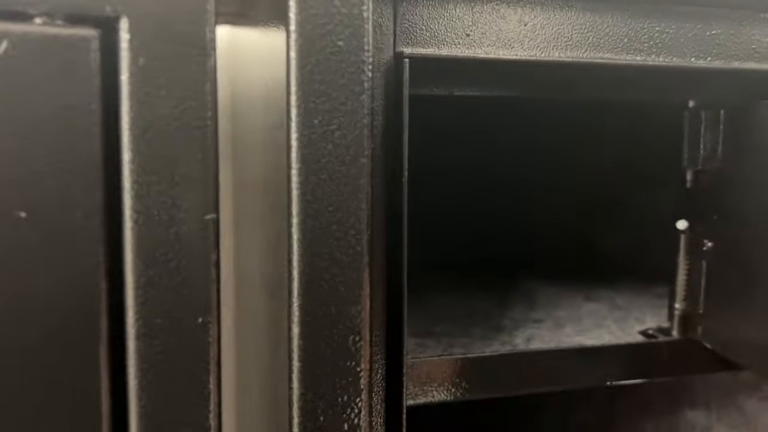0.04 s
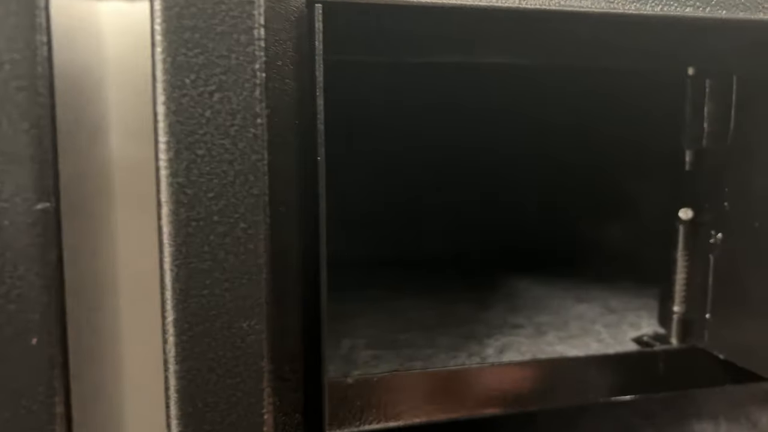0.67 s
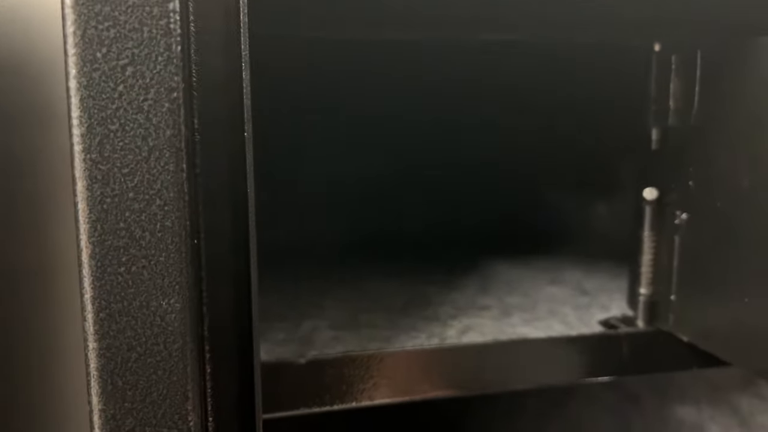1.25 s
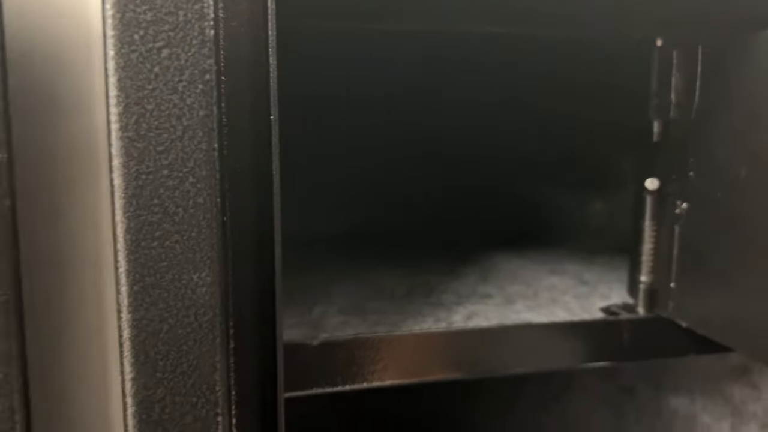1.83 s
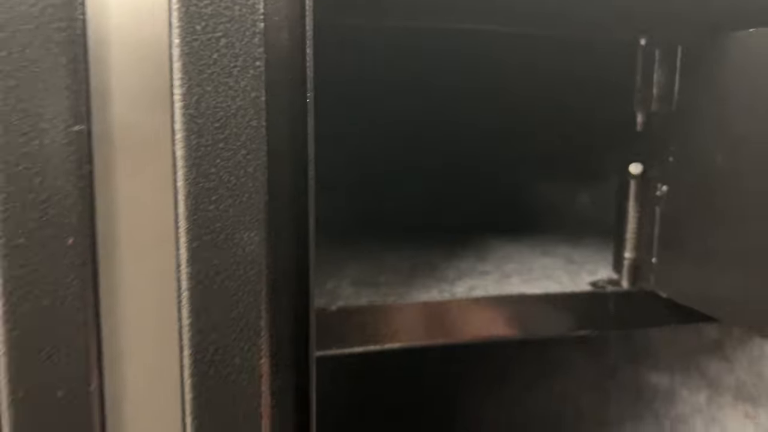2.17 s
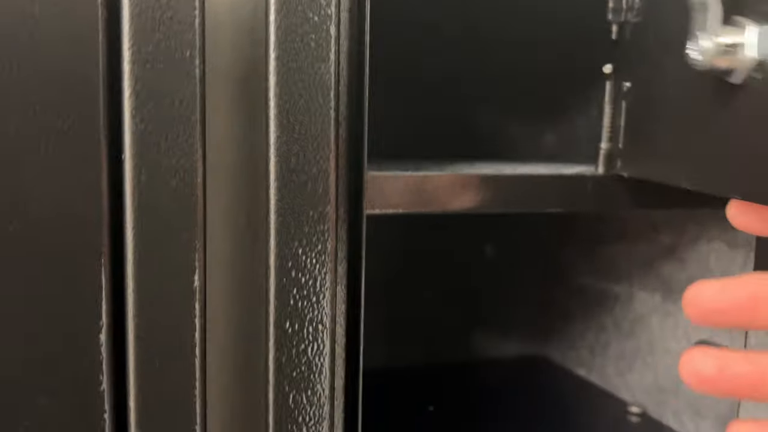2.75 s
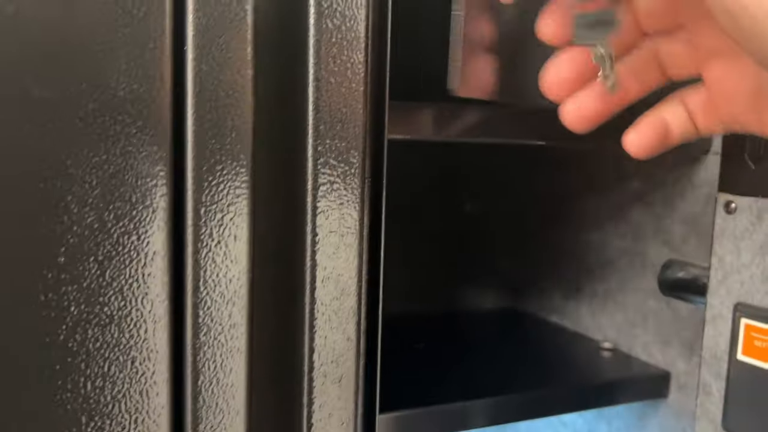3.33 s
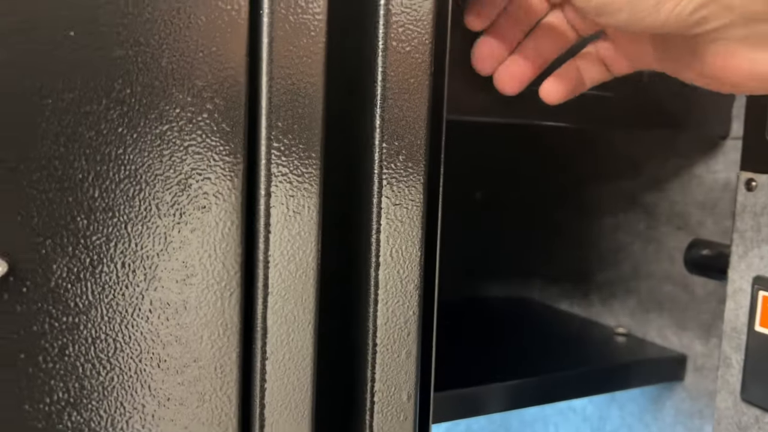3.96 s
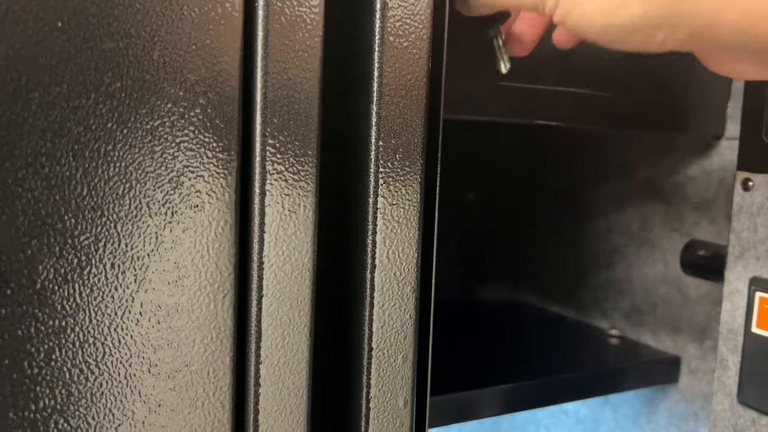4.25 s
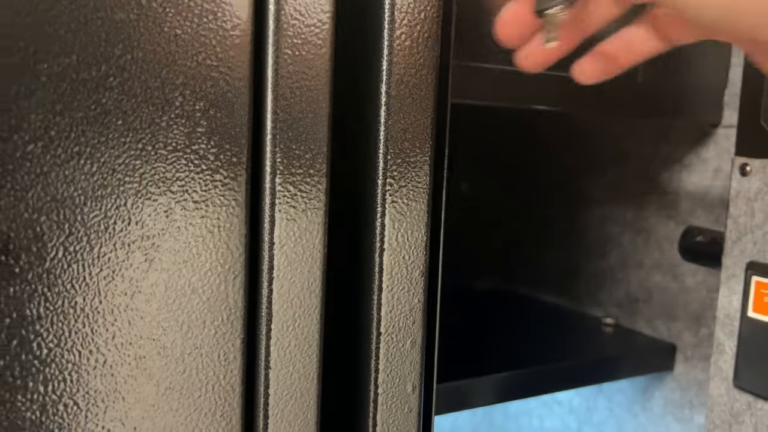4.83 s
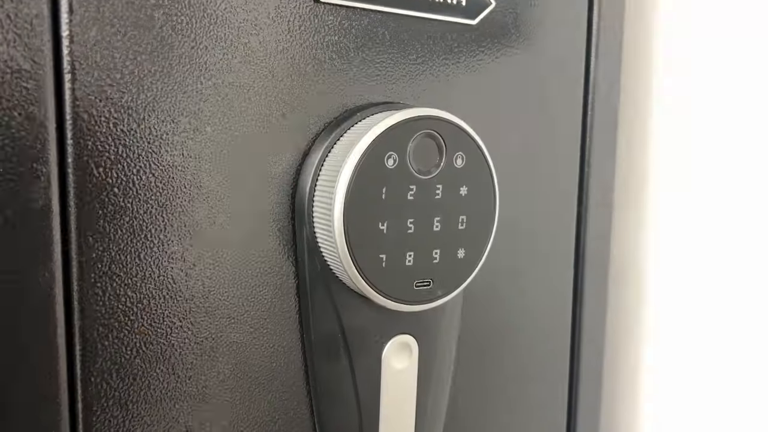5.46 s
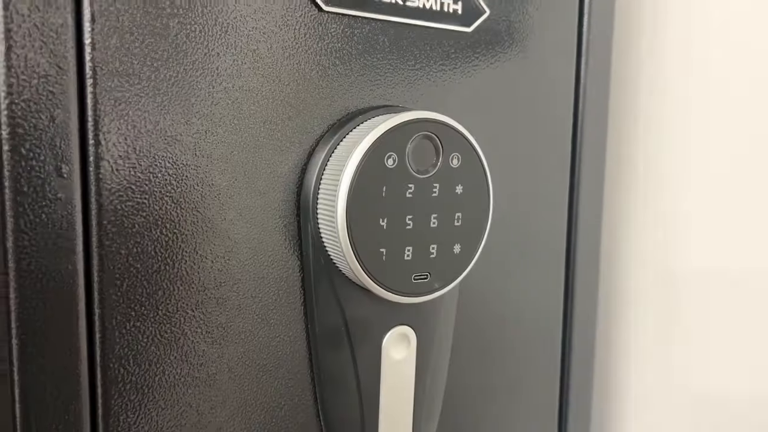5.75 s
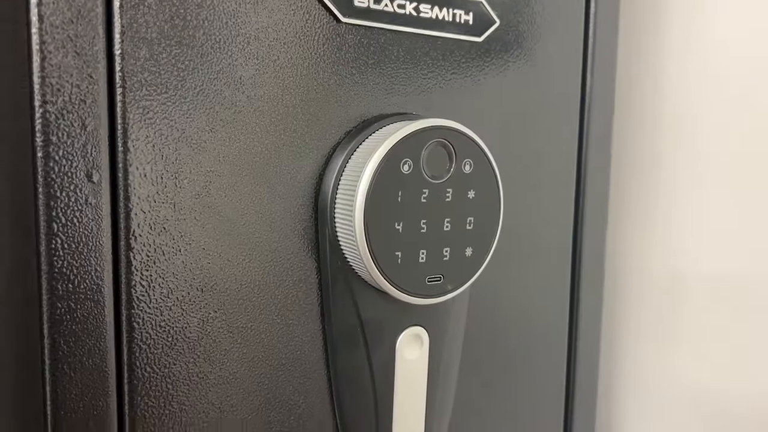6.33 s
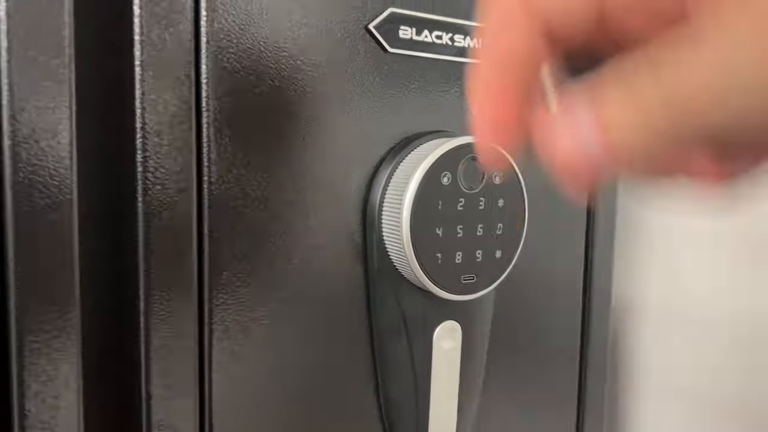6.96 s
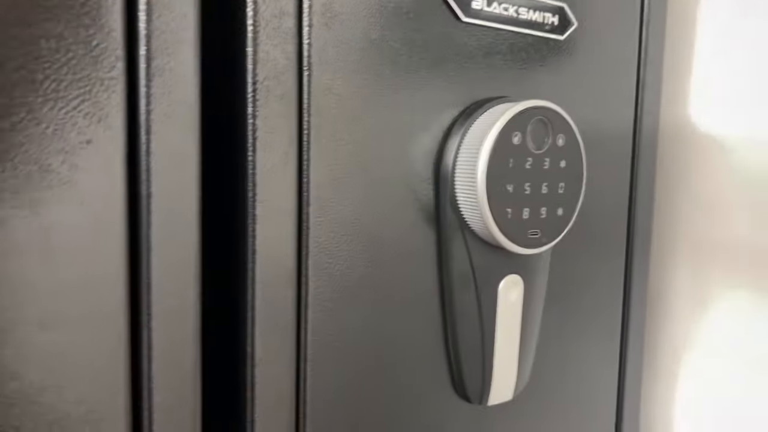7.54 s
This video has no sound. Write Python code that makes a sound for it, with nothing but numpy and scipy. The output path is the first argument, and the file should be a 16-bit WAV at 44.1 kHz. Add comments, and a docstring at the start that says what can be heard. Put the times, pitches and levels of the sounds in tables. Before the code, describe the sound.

In a small room with humming ventilation, a quick run of ringing metal clacks comes from a safe's bolts, heard up close. Clothes rustle softly before a small steel door bumps and shuts with a loud crack and thud. Gritty key scrapes, taps and sharper knocks follow at the lock. Then come faint key clinks, a cloth scuff and thin squeaks, ending with a short metallic knock.

```python
"""Locking a steel safe

In a small, humming room, heavy bolts clack against their stops and ring. A hand swings the small
inner door shut: it cracks and thuds, and its steel rings on. The key scrapes over the pins of the
lock and comes out. Keys clink, clothes rustle, a sleeve scuffs, and the door is knocked once more.
All of it is heard from close by, with a short echo from the walls."""
import sys
import numpy as np
from scipy import signal
from scipy.fft import rfft, irfft, next_fast_len
from scipy.io import wavfile
from scipy.ndimage import uniform_filter1d

SR = 44100
rng = np.random.default_rng(int(sys.argv[2]) if len(sys.argv) > 2 else 0)


def generate_wav(sig):
    """Save sig (samples, or channels by samples) to the path in sys.argv[1] as 16-bit PCM at SR."""
    pcm = np.round(np.clip(np.atleast_2d(sig).T, -1, 1) * 32767).astype(np.int16)
    wavfile.write(sys.argv[1], SR, pcm)


N = 339570
TIME = np.arange(N) / SR  # seconds since the scene began
AGE = np.arange(24000) / SR  # seconds since one short sound began


# Each clack of a bolt: start_s, level_db, click_db, damping_s
CLACKS = [(.072, -29, -61.5, 0.23), (.107, -21, -30, 0.19), (0.159, -28, -36, 0.11), (.205, -45, -62, .33),
          (.229, -43.5, -60, 0.3), (.272, -54.5, -75, 0.34), (3.282, -31.5, -43.5, 0.013),
          (4.539, -49, -56, 0.014), (4.6718, -47, -52, 0.01)]
# The tones a bolt rings with: pitch_hz, level_db, ring_s (time to fade by 60 dB if left alone)
BOLT_TONES = [(287.5, -12, .8), (499.8, -8.5, .9), (868, -17, .8), (1055, -6, .27), (1299.8, 3, .27),
              (1322, -1, .18), (1379, -5, .2), (1396.8, 1, .25), (1520, -8, .25), (1615, -5, .28),
              (1695, -7, .26), (1817.3, -3, .33), (1969, -9, .25), (2127.5, -3, .19), (2162.7, 3, .24),
              (2966, -13, .22), (3104, -7, .2), (3408.4, -3, .19), (4100, 1, .07), (4210.5, 2, .1),
              (4597, -6, .09), (4939, 2, .08), (5556, -17, .2), (6228, -10, .13)]
# The noisy clatter above those tones: pitch_hz, level_db
BOLT_CLATTER = [(120, -17), (300, -18.5), (500, -22), (800, -15), (1300, -2), (2100, -1), (2600, -11),
                (3400, -2.5), (3800, -9.5), (4170, 0), (4400, -11.5), (4900, 1.5), (5200, -12.5),
                (9000, -27.5), (16000, -30.5)]
def bolts():
    """Heavy steel bolts hit their stops and ring, until the stop soaks up the ringing."""
    out = np.zeros((2, N))
    for start, db, click_db, damping_s in CLACKS:
        # a weaker, shorter twin close to each tone makes it wobble
        twins = [(hz * (1 + .02 * rng.standard_normal()), level - 8, .55 * ring_s)
                 for hz, level, ring_s in BOLT_TONES]
        tones = amp(-1.4) * ring(BOLT_TONES + twins, uneven_db=1, spread=.7)
        steel = tones + amp(-5.5) * clatter(BOLT_CLATTER, direct=.1)
        pressed = (.68 + .52 * np.exp(-(AGE / .019) ** 2)) * np.exp(-AGE / damping_s)
        clack = amp(db) * steel * pressed + amp(click_db) * click(ring_s=.038)
        add(out, start, clack * onset(.0014))
    return out


# The door meets its frame: start_s, panel_db, crack_db, thud_db, thud_hz, spot_hz, spot_db
KNOCKS = [(2.477, -47, -50.5, -33, 116.4, 1320, -14), (3.281, -35, -42, -48.5, 201, 1436, 7.5),
          (3.7719, -23.5, -22, -18.5, 162, 775, 4), (4.543, -43.5, -46.5, -33.5, 168.5, 555, 12),
          (4.58, -39.5, -72, -46.5, 182, 425, 15), (4.669, -37, -42, -39.5, 165.5, 1220, 6.5),
          (7.676, -41.5, -43.5, -39.5, 197, 1290, 6)]
# Soft bumps of the hand and the swinging door: start_s, level_db, pitch_hz
BUMPS = [(0.238, -41, 69.8), (0.927, -58.5, 499), (2.686, -45, 210), (2.749, -42.5, 320),
         (3.323, -30.5, 199.4), (3.353, -33.5, 307), (3.556, -40.5, 236.5), (3.629, -40.5, 183.5),
         (3.729, -42, 190.4), (3.759, -36, 173), (3.784, -26.5, 82.2), (3.797, -31.5, 236.7),
         (3.999, -36, 75.6), (4.065, -33.5, 79.5), (4.105, -38, 385), (4.206, -36, 89.5), (4.287, -39, 75),
         (4.487, -39, 128), (4.676, -33.5, 97)]
# Dull taps, mostly from the latch behind the panel: start_s, level_db, spot_hz, spot_db
TAPS = [(2.639, -50, 778, 21), (3.752, -36, 644, -1), (4.023, -48, 1424, 4), (4.051, -43.5, 586, 5),
        (4.091, -43, 894, 2), (4.162, -39, 1910, 1), (4.113, -41.5, 1700, 1), (4.196, -37.5, 1250, 1),
        (4.223, -47, 850, 29.5), (4.386, -50.5, 1187, 7.5), (4.484, -52.5, 1490, 1),
        (7.574, -64.5, 990, 10)]
DULL_HZ = 2420  # soft touches stir little above this pitch
def door():
    """Hard knocks crack, ring and thud; soft bumps mostly thud; taps mostly ring the panel."""
    out = np.zeros((2, N))
    for start, panel_db, crack_db, thud_db, thud_hz, spot_hz, spot_db in KNOCKS:
        contact_s = .0032 * 2 ** ((-43 - crack_db) / 15.5)  # harder knocks are more sudden
        tones_db = 5 + .42 * (panel_db + 24.5)  # and ring more purely
        knock = panel(panel_db, spot_hz, spot_db, tones_db) + amp(crack_db) * crack()
        add(out, start, knock * onset(contact_s))
        add(out, start + .005, amp(thud_db) * thud(thud_hz) * onset(.0013))  # the door gives way
    for start, db, hz in BUMPS:
        steel = dull(panel(db - 7, hz, spot_db=0, tones_db=-10.5), above_hz=880)
        add(out, start, (amp(db) * thud(hz) + steel) * onset(.0078))
    for start, db, spot_hz, spot_db in TAPS:
        steel = dull(panel(db, spot_hz, spot_db, tones_db=-.5), DULL_HZ)
        add(out, start, (steel + amp(db - 11.5) * box()) * onset(.002))
    return out


# The tones of the door panel: pitch_hz, level_db, ring_s
PANEL_TONES = [(496.4, .5, .28), (592, -15, .5), (665, -9, .3), (695, -5, .3), (778, -5, .27),
               (863.4, 2, .29), (1007, -10, .29), (1072, -1, .28), (1335, -3.5, .21), (1480, -10, .2),
               (1663, -11, .2), (1783, -1, .13), (1852, -1, .14), (2150, -11, .11), (2770, -13, .07)]
# The panel's noisy clatter: pitch_hz, level_db
PANEL_CLATTER = [(120, -23), (350, 6.5), (600, -2), (900, -3.5), (1400, -3), (2100, -8.5), (2700, -12),
                 (5000, -10.5), (16000, -44.5)]
def panel(level_db, spot_hz, spot_db, tones_db):
    """The panel rings, brighter for light taps; the spot that is hit shifts the level near spot_hz."""
    tilt = np.clip(.19 * (-21.5 - level_db), 0, 4)  # dB per octave
    spot = lambda hz: spot_db * np.exp(-(np.log2(hz / spot_hz) / .28) ** 2)
    tones = [(hz, db + spot(hz) + tilt * np.log2(hz / PANEL_TONES[0][0]), ring_s)
             for hz, db, ring_s in PANEL_TONES]
    ringing = amp(tones_db) * ring(tones, uneven_db=1.8, spread=.45)
    pitches = np.geomspace(100, 16000, 60)
    bass_cut_db = tilt * np.log2(np.minimum(pitches, DULL_HZ) / DULL_HZ)
    colour = np.transpose([pitches, look_up(PANEL_CLATTER, pitches) + spot(pitches) + bass_cut_db])
    return amp(level_db) * unit_hit(ringing + clatter(colour, direct=.45))


def thud(hz):
    """The door bends to and fro a few times under the hand and shakes the box."""
    bending = unit_hit(np.sin(2 * np.pi * hz * AGE) * onset(.0067) * np.exp(-(AGE / .021) ** 2))
    return amp(-.5) * bending + amp(-7) * box()


# The low tones of the safe's body: pitch_hz, level_db, ring_s
BOX_TONES = [(62, -8, .5), (86, -6, .45), (104, -6, .3), (161.4, -2, .25), (212.4, 3.5, .36), (252, -6, .3),
             (289.3, 2, .32), (394, -9, .3), (449, -7, .35)]
def box():
    """The whole steel box booms."""
    return ring(BOX_TONES, uneven_db=4.5, spread=.13) * onset(.0041)


# How long the clatter lasts: pitch_hz, ring_s
CLATTER_FADE = [(200, 0.93), (1000, 0.38), (2500, 0.17), (6000, 0.13), (15000, 0.051)]
def clatter(colour, direct):
    """Struck steel has so many short, crowded tones that they blur into noise."""
    burst = fade_by_pitch(coloured(noise(10240, direct), colour), CLATTER_FADE)
    return unit_hit(padded(burst))


# The tone colour of steel edges meeting: pitch_hz, level_db
EDGE_COLOUR = [(600, -14), (2000, 3), (3600, -10), (5000, -1), (6200, -3), (7100, -2), (8800, -4.5),
               (12400, -5.5), (13500, -6), (16000, -22.5)]
# Pitches that stand out in it: pitch_hz, width_hz, level_db
EDGE_PEAKS = [(3270, 32, -6), (5400, 21, -5), (6720, 120, 1.5), (7880, 50, 0), (8300, 79, -8),
              (8600, 32, -4.5), (11300, 55, -1), (12400, 84, -1)]
def click(ring_s, extra_peaks=()):
    """Two steel edges meet with a bright click; small parts add a pitch of their own."""
    hiss = coloured(noise(4096, direct=.93), EDGE_COLOUR)
    burst = resonant(hiss, EDGE_PEAKS + list(extra_peaks), floor_db=-5)
    return unit_hit(padded(burst) * amp(-60 * AGE / ring_s))


def crack():
    """The door's edges click, then ring on faintly."""
    hiss = coloured(noise(len(AGE), direct=.8), EDGE_COLOUR)
    ringing = resonant(hiss, EDGE_PEAKS, floor_db=-12.5) * amp(-60 * AGE / .12)
    return click(ring_s=.04) + amp(-26) * unit_hit(ringing)


# The ringing after the slam: start_s, level_db, ring_s
AFTER_RING = (3.782, -45, .36)
# The high pitches of the door's steel: pitch_hz, width_hz, level_db
STEEL_PEAKS = [(2770, 40, 0), (3280, 50, 3), (4600, 41, 1), (5290, 70, -4), (5540, 30, 1), (6910, 80, 0),
               (7320, 42, -3), (7880, 70, -2)]
def after_ring():
    """The door's steel rings on after the slam, bright and slightly grainy."""
    start, db, ring_s = AFTER_RING
    grain = 2 + grains(len(AGE), per_s=560, fade_s=.002)
    hiss = grain * coloured(noise(len(AGE), direct=.6), EDGE_COLOUR)
    out = np.zeros((2, N))
    add(out, start, amp(db) * resonant(hiss, STEEL_PEAKS, floor_db=-15.5) * amp(-60 * AGE / ring_s))
    return out


# Each scrape of steel on steel: start_s, level_db, length_s, rasp_hz
SCRAPES = [(0.054, -58, 0.0097, 3480), (3.267, -62.5, .01, 7000), (3.294, -43, .005, 4500),
           (3.312, -44, .003, 8000), (3.321, -44, .002, 8000), (3.36, -67, 0.045, 4600),
           (3.39, -56, .004, 8400), (3.758, -53.5, 0.0064, 7000), (4.026, -73, 0.012, 13500),
           (4.047, -52, 0.0048, 6740), (4.062, -53, 0.0065, 13600), (4.075, -50, 0.0031, 8070),
           (4.091, -56, 0.0021, 8030), (4.109, -55, .004, 6650), (4.118, -55, .006, 8070),
           (4.171, -53, .002, 3500), (4.183, -47, 0.0088, 13700), (4.195, -50.5, 0.0062, 3460),
           (4.439, -69, 0.018, 13900), (4.523, -61, 0.0083, 5100), (4.534, -45, .009, 7000),
           (4.559, -41.5, 0.011, 4500), (4.579, -39, .007, 4360), (4.597, -42.5, 0.006, 5040),
           (4.615, -46, .007, 6900), (4.65, -50, .008, 8000), (4.658, -40, 0.002, 4600),
           (4.669, -44, 0.0019, 12400), (4.68, -55, 0.0016, 13000), (6.616, -64, .003, 12000),
           (6.708, -68.5, .003, 11300), (7.264, -68, .003, 6000), (7.315, -72.5, .003, 6200),
           (7.665, -38.5, .003, 4550), (7.671, -37, 0.014, 4770)]
# The tone colour of a scrape: pitch_hz, level_db
SCRAPE_COLOUR = [(500, -8.5), (2000, -1.5), (3200, -6.5), (4700, 0), (5500, -1), (6600, -0.5), (8500, -5),
                 (10500, -4), (13500, 3.5), (16000, -8.5)]
# Pitches that stand out in it: pitch_hz, width_hz, level_db
SCRAPE_PEAKS = [(1340, 86, -3.5), (1894, 58, -3), (3500, 70, -7), (4420, 22, -3.5), (4560, 46, -0.5),
                (6500, 60, -6), (8000, 83, -0.5), (13000, 52, -7.5), (14730, 88, -3)]
def scrapes():
    """Steel sticks and slips on steel in short, gritty scrapes, some from the key in the lock."""
    out = np.zeros((2, N))
    t = AGE[:SR // 8]
    fade_out = np.clip((.1 - t) / .03, 0, 1)
    for start, db, length, rasp_hz in SCRAPES:
        grip = unit_level(grains(len(t), per_s=900, fade_s=.001) + 1.2)
        pressure = np.minimum(t / .0041, 1) * np.exp(-np.maximum(t - length, 0) / .0065)
        friction = pressure * grip * coloured(noise(len(t), direct=1), SCRAPE_COLOUR)
        scrape = resonant(friction, SCRAPE_PEAKS + [(rasp_hz, 300, -1)], floor_db=-9.5)
        add(out, start, amp(db) * np.sqrt(np.mean(pressure ** 2)) * scrape * fade_out)
    return out


# Each clink of the keys: start_s, level_db, centre_hz (where it rings most)
CLINKS = [(2.716, -64.5, 13000), (2.858, -66.5, 13500), (2.888, -64, 12500), (3.123, -66, 8400),
          (3.141, -67, 10700), (3.276, -46.5, 13600), (3.329, -50.5, 12850), (3.34, -56, 14000),
          (3.403, -54, 8400), (3.409, -46.5, 14200), (3.468, -59.5, 14000), (3.492, -69, 13500),
          (3.518, -69.5, 8400), (5.846, -77, 12720), (6.366, -64.5, 4500), (6.375, -66.5, 7200),
          (6.425, -62, 5300), (6.444, -70, 4080), (6.683, -58.5, 11000), (6.746, -67.5, 6430),
          (6.924, -62, 12500), (7.157, -57.5, 7900), (7.163, -61, 12800), (7.2238, -58.5, 8750)]
# The tones of the keys: pitch_hz, level_db, ring_s
KEY_TONES = [(2680, -5, .06), (4400, -3, .03), (4700, -4, .035), (6400, -3, .03), (7500, -2, .03),
             (8370, 0, .03), (11500, -3, .03), (13000, -1, .025), (14100, -1, .025)]
def keys():
    """Keys touch, ring very briefly and touch again; the grip shifts their pitch each time."""
    out = np.zeros((2, N))
    for start, db, centre_hz in CLINKS:
        for delay, touch_db in [(0, -1), (rng.uniform(.003, .0043), -5)]:
            tones = [(hz * (1 + .03 * rng.standard_normal()),
                      level - 15 * abs(np.log2(hz / centre_hz)), ring_s)
                     for hz, level, ring_s in KEY_TONES]
            ringing = amp(-2) * ring(tones, uneven_db=2, spread=.2)
            clink = ringing + click(ring_s=.03, extra_peaks=[(centre_hz, 700, 10)])
            add(out, start + delay, amp(db + touch_db) * clink * onset(.0007))
    return out


# One scuff of a sleeve: start_s, length_s, landing_db, rubbing_db
SCUFF = (6.44, .13, -50, -58)
# Its tone colour: pitch_hz, level_db
SCUFF_COLOUR = [(500, -13), (1100, -5.5), (1500, -4), (2000, -7.5), (2600, -5.5), (3300, -11), (5500, -14),
                (9000, -41), (16000, -39)]
# Pitches that stand out as it lands, and as it rubs: pitch_hz, width_hz, level_db
LANDING_PEAKS = [(1346, 32, 6), (1600, 92, -6), (2025, 41, 1), (2430, 55, -19), (3890, 200, -2)]
RUB_PEAKS = [(1250, 200, -5), (1530, 200, 0), (2000, 120, -6), (2430, 120, -10)]
def sleeve():
    """Cloth lands with a broad scuff, then rubs on unevenly at a rising pitch."""
    start, length, landing_db, rubbing_db = SCUFF
    grain = amp(1.3 * unit_level(uniform_filter1d(rng.standard_normal(N), size=300)))
    def rub(peaks, floor_db):
        hiss = coloured(noise(next_fast_len(N), direct=.17), SCUFF_COLOUR)
        return unit_level(grain * resonant(hiss, peaks, floor_db)[:, :N])
    touch = amp(landing_db) * swell(start, .0047, rise_s=.0029, fade_s=.045)
    landing = touch * rub(LANDING_PEAKS, floor_db=-12)
    speed = 1 + .5 * np.clip(TIME - start - length / 2, -length / 2, length / 2)
    steady = rub(RUB_PEAKS, floor_db=-15.5)
    rising = np.array([np.interp(np.cumsum(speed) / SR, TIME, side) for side in steady])
    catching = amp(rubbing_db + 2.5 * wander(step_s=.009))
    return landing + catching * swell(start, length, rise_s=.03, fade_s=.08) * rising


# Thin squeaks: start_s, length_s, level_db, pitch_hz
SQUEAKS = [(6.465, .02, -65, 3900), (6.575, .06, -66, 2650), (6.61, .02, -71, 6200),
           (6.645, .022, -68, 6300), (6.66, .07, -66, 1550), (6.68, .04, -70, 6380),
           (6.765, .03, -75, 3100), (7.265, .07, -71, 2700), (7.295, .03, -75, 6300)]
def squeaks():
    """Something smooth sticks and slips, making brief, fuzzy tones."""
    out = np.zeros((2, N))
    for start, length, db, hz in SQUEAKS:
        tone = noise(len(AGE), direct=.8)
        for _ in range(2):  # filtering twice narrows the noise to nearly one pitch
            tone = resonant(tone, [(hz, 220, 0)], floor_db=-60)
        add(out, start, amp(db) * tone * np.sin(np.pi * np.minimum(AGE / length, 1)))
    return out


# Each move of the arm: start_s, length_s, level_db
RUSTLES = [(0, 0.59, -63.5), (0.917, 0.1, -67.5), (1.76, 0.6, -61.5), (2.287, 0.0092, -64.5),
           (2.346, 0.69, -62), (5, 0.42, -72), (5.799, .28, -69), (6.238, 0.32, -63), (6.902, 0.12, -62.5),
           (7.21, 0.13, -67)]
# The tone colour of sliding cloth: pitch_hz, level_db
CLOTH_COLOUR = [(500, 5), (1500, 5.5), (3000, -1.5), (5000, -2), (8000, -6.5), (10500, -11), (13000, -3),
                (16000, -18.5)]
def clothes():
    """Cloth slides with a faint hiss that swells gently with its folds."""
    moves = sum(amp(db) * swell(start, length, rise_s=.52 * length, fade_s=.059)
                for start, length, db in RUSTLES)
    folds = amp(1.3 * wander(step_s=.06))
    return moves * folds * long_noise(CLOTH_COLOUR, direct=.96)


# One brief hiss: start_s, length_s, level_db
SIZZLE = (5.545, .065, -72)
# Its tone colour: pitch_hz, level_db
SIZZLE_COLOUR = [(6500, -42), (8200, 9.5), (9500, 8), (11000, -21), (12500, -35)]
def sizzle():
    """A thin, high hiss sounds for a moment."""
    start, length, db = SIZZLE
    level = amp(db) * swell(start, length, rise_s=.0059, fade_s=.004)
    return level * long_noise(SIZZLE_COLOUR, direct=.45)


# The tone colour of the echo: pitch_hz, level_db
ECHO_COLOUR = [(250, 1), (500, 0.5), (1000, 0.5), (2000, 0), (6000, -9.5), (14000, -15)]
# How long it lasts: pitch_hz, ring_s
ECHO_FADE = [(80, .9), (300, .75), (900, .28), (2000, .4), (6000, .34), (15000, .27)]
def room_echo(x):
    """The walls send back a short, blurred echo with little treble."""
    tail = fade_by_pitch(coloured(noise(len(AGE)), ECHO_COLOUR), ECHO_FADE) * onset(.0095)
    return signal.oaconvolve(x, tail / np.linalg.norm(tail[0]), axes=1)[:, :N]


# Rumbling air and humming tones, at the open safe and in front of its door: pitch_hz, level_db
AIR_OPEN = [(15, -62.5), (25, -37), (42, -7.5), (64, 2), (125, -12.5), (142, -18), (181, -18.5),
            (207, -22.5), (438, -16.5), (621, -31), (927, -31), (1000, -38), (2070, -36.5), (2560, -45.5),
            (15000, -68.5)]
HUM_OPEN = [(59.3, -54), (177.6, -64), (312, -73), (431, -72), (953, -75)]
AIR_FRONT = [(20, -35.5), (32, -9.5), (46, 9.5), (70, -2.5), (125, -12), (170, -16), (293, -12.5),
             (462, -25.5), (952, -27), (1180, -31.5), (1810, -31), (2850, -40.5), (8000, -53.5),
             (15000, -57)]
HUM_FRONT = [(118.4, -49), (231.5, -85), (290.7, -61.5), (296, -66.5), (360.7, -65.5), (958, -75.5),
             (3830, -88)]
def ventilation(turn_s=5.46):
    """The ventilation rumbles and hums, heard at the open safe and then in front of its door."""
    at_open = amp(-49) * long_noise(AIR_OPEN) + hum(HUM_OPEN)
    in_front = amp(-49) * long_noise(AIR_FRONT) + hum(HUM_FRONT)
    turned = np.clip((TIME - turn_s) / .095, 0, 1)
    return np.sqrt(1 - turned) * at_open + np.sqrt(turned) * in_front


def hum(tones):
    """Steady machine tones waver a little in level and pitch."""
    out = np.zeros(N)
    for hz, db in tones:
        level = amp(db + 3.2 * wander(step_s=.25))
        drift = .0012 * min(hz, 400) * wander(step_s=.25)
        out += level * np.sin(2 * np.pi * hz * TIME + drift)
    return out


# How much louder the left microphone is: pitch_hz, difference_db
LEFT_LOUDER = [(100, -2.5), (300, -1.5), (520, -1), (800, -2.5), (1250, -0.3), (1900, 0.5), (3000, 1),
               (4600, 2.5), (7000, 0.4), (13000, -0.8)]
# How far the right one trails behind: pitch_hz, lag_radians
RIGHT_LAG = [(20, -1), (1400, 1.13), (3500, 1.5), (5000, 1.78), (6600, 1.37), (8800, 0.5), (10100, -4),
             (11300, -5), (12200, -5), (15000, -6)]
def microphones(x):
    """Near sound loses its deepest bass and reaches the two microphones a little differently."""
    size = next_fast_len(N)
    hz = np.fft.rfftfreq(size, 1 / SR)
    x = signal.sosfilt(signal.butter(3, 48, "highpass", fs=SR, output="sos"), x)
    left = amp(look_up(LEFT_LOUDER, hz) / 2)
    right = np.exp(-1j * look_up(RIGHT_LAG, hz)) / left
    return irfft(rfft(x, size) * np.array([left, right]), size)[:, :N]


# How alike left and right are for sound from all around: pitch_hz, likeness (0 to 1)
LIKENESS = [(60, 0.99), (130, 0.95), (290, 0.48), (640, 0.056), (1400, 0.064), (15000, 0.059)]
def noise(size, direct=0):
    """Left and right white noise, more alike in the bass and the more direct the sound is."""
    left, other = rfft(rng.standard_normal((2, size)))
    alike = np.clip(direct + (1 - direct) * look_up(LIKENESS, np.fft.rfftfreq(size, 1 / SR)), -1, 1)
    right = alike * left + np.sqrt(1 - alike ** 2) * other
    return irfft(np.array([left, right]), size)


def long_noise(colour, direct=0):
    """Coloured noise that lasts the whole scene."""
    return coloured(noise(next_fast_len(N), direct), colour)[:, :N]


def ring(tones, uneven_db, spread):
    """Fading tones; each hit mixes them anew, and spread puts left and right out of step."""
    hz, db, ring_s = np.transpose(tones)
    weight, skew = rng.standard_normal((2, len(hz)))
    height = amp(db + uneven_db * weight) * (-1) ** np.arange(len(hz))
    sides = height * np.exp(1j * spread * np.outer([-1, 1], skew))
    out = np.zeros((2, len(AGE)))
    for pair, pitch, life in zip(sides.T, hz, ring_s):
        t = AGE[AGE < life]
        tone = np.exp((2j * np.pi * pitch - np.log(1000) / life) * t)
        out[:, :len(t)] += np.outer(pair, tone).imag
    return unit_hit(out)


def grains(size, per_s, fade_s):
    """A grainy level: tiny jumps at chance moments, each dying quickly."""
    hits = (rng.random(size) < per_s / SR) * np.minimum(rng.exponential(1, size), 3)
    return unit_level(signal.lfilter([1], [1, -np.exp(-1 / (fade_s * SR))], hits))


def coloured(x, colour):
    """Gives a sound its tone colour: how strong each pitch is."""
    size = x.shape[-1]
    gain = amp(look_up(colour, np.fft.rfftfreq(size, 1 / SR)))
    return unit_level(irfft(rfft(x) * gain, size))


def resonant(x, peaks, floor_db):
    """Makes a few pitches stand out; the rest sinks to floor_db."""
    f = np.fft.rfftfreq(x.shape[-1], 1 / SR)
    power = sum(amp(db) ** 2 / (1 + (2 * (f - hz) / width) ** 2) for hz, width, db in peaks)
    return unit_level(irfft(rfft(x) * np.sqrt(power + amp(floor_db) ** 2), x.shape[-1]))


def fade_by_pitch(x, ring_times):
    """Lets each pitch die away at its own speed."""
    hz, t, bands = signal.stft(x, SR, nperseg=256)
    fade = amp(-60 * t / look_up(ring_times, hz)[:, None])
    return signal.istft(bands * fade, SR, nperseg=256)[1][:, :x.shape[1]]


def dull(x, above_hz):
    """Takes away the treble, as a soft touch does."""
    return signal.sosfilt(signal.butter(3, above_hz, fs=SR, output="sos"), x)


def onset(rise_s):
    """A quick rise from silence to full level."""
    return 1 - np.exp(-AGE / max(rise_s, 1e-4))


def swell(start, length, rise_s, fade_s):
    """The level of one brushing move: it rises, holds and fades."""
    rise = np.clip((TIME - start) / rise_s, 0, 1)
    return rise * np.exp(-np.maximum(TIME - start - length, 0) / fade_s)


def wander(step_s):
    """Glides to a new random value at every step."""
    steps = np.arange(0, TIME[-1] + 1, step_s)
    return np.interp(TIME, steps, rng.standard_normal(len(steps)))


def amp(db):
    """Turns decibels into a gain."""
    return 10 ** (np.asarray(db) / 20)


def unit_level(x):
    """Scales a sound to an average (rms) level of 1."""
    return x / np.sqrt(np.mean(x ** 2) + 1e-20)


def unit_hit(x):
    """Scales a hit so that its first 30 ms have an average level of 1."""
    return x / np.sqrt(np.mean(x[..., :round(.03 * SR)] ** 2))


def look_up(table, hz):
    """Reads a table at any pitch, sliding between its rows."""
    pitches, values = np.transpose(table)
    return np.interp(np.log(hz + 1), np.log(pitches + 1), values)


def padded(burst):
    """Adds silence to make a burst as long as AGE."""
    return np.pad(burst, [(0, 0), (0, len(AGE) - burst.shape[1])])


def add(mix, start_s, sound):
    """Places a sound in the mix."""
    part = mix[:, round(start_s * SR):][:, :sound.shape[-1]]
    part += sound[..., :part.shape[1]]


def scene():
    """Steel, keys and cloth close by, their echo, and the room's own sound."""
    clacks = bolts()
    knocks = door() + after_ring()
    small_sounds = scrapes() + keys() + sleeve() + squeaks()
    echo = room_echo(amp(-13.5) * clacks + amp(-18.5) * knocks + amp(-8) * small_sounds)
    near = microphones(clacks + knocks + small_sounds + clothes() + echo)
    return near + sizzle() + ventilation() * amp([[-.5], [.5]])  # a little louder on the right


def record(dry):
    """The microphones lose a narrow slice of treble, and the recorder cuts the very top."""
    dipped = signal.lfilter(*signal.iirnotch(10100, Q=11, fs=SR), dry)
    top_cut = signal.firwin(511, 16200, window=("kaiser", 9), fs=SR)
    return signal.oaconvolve(dipped, top_cut[None], "same")


dry = scene()
out = record(dry)
generate_wav(out)
```